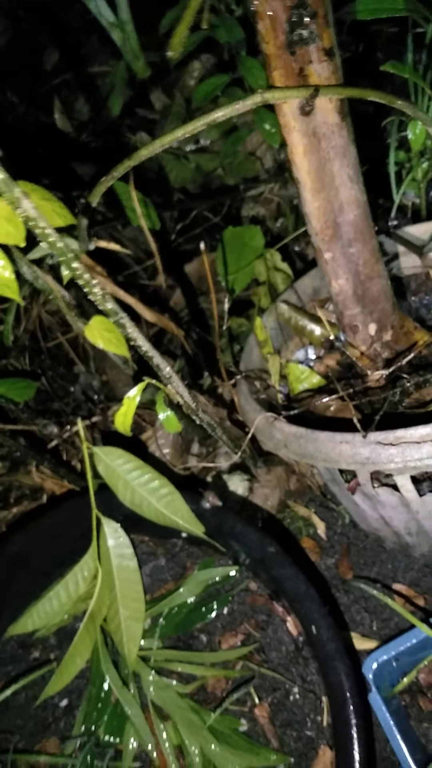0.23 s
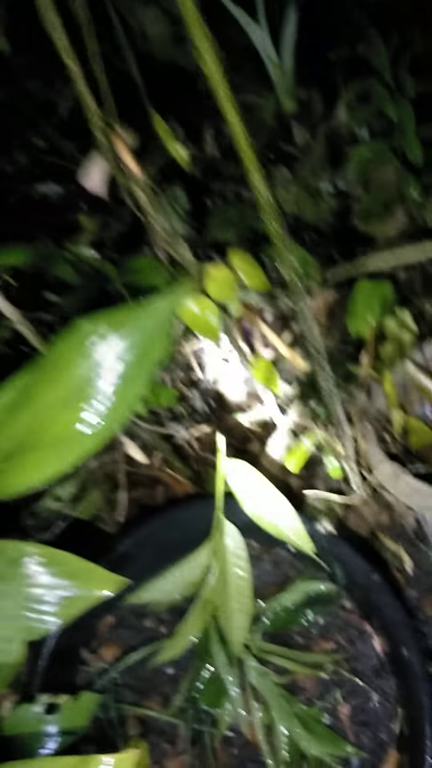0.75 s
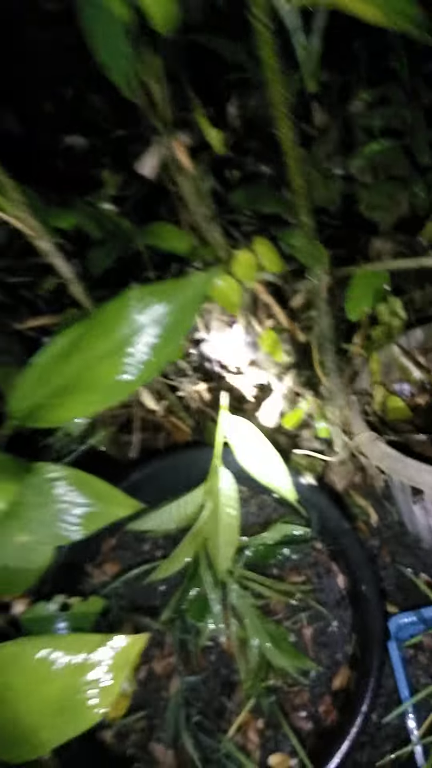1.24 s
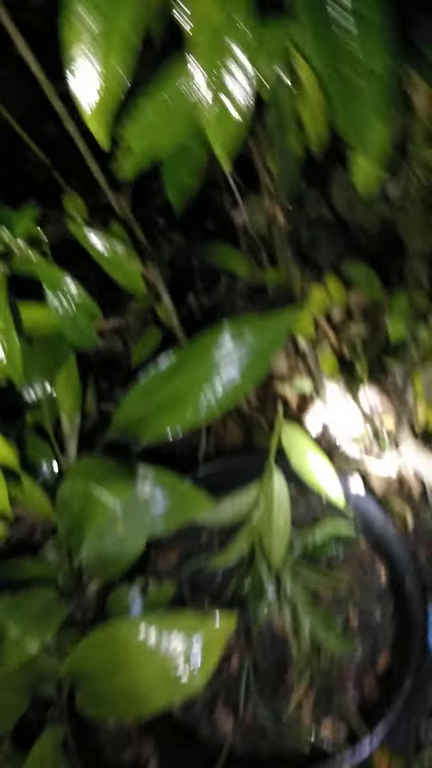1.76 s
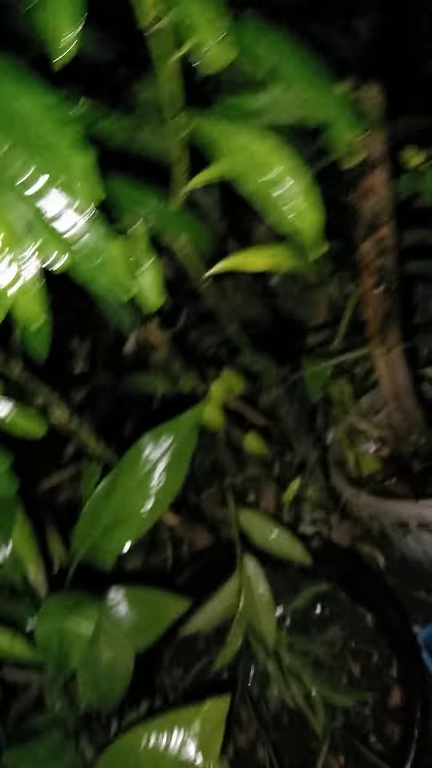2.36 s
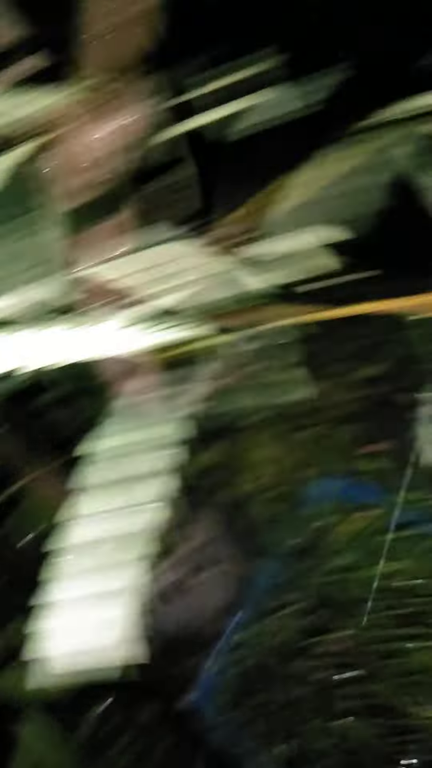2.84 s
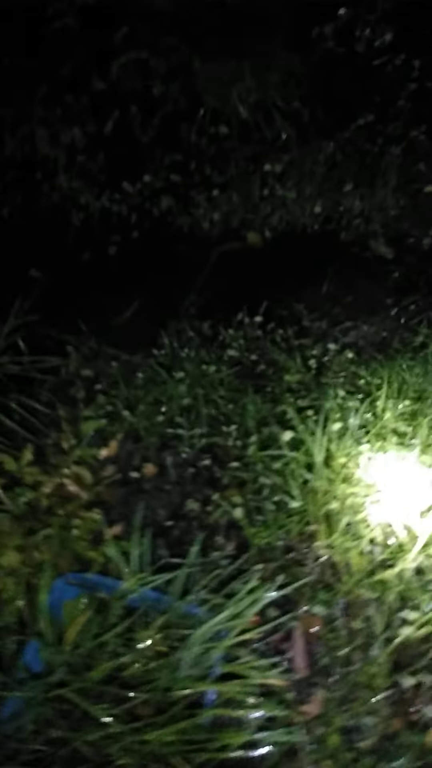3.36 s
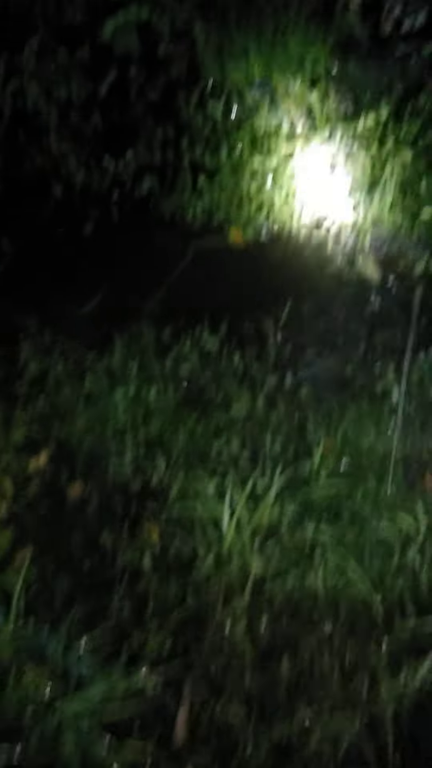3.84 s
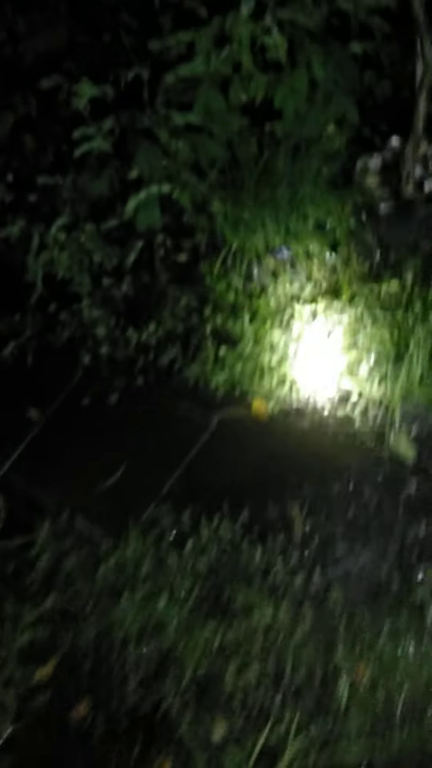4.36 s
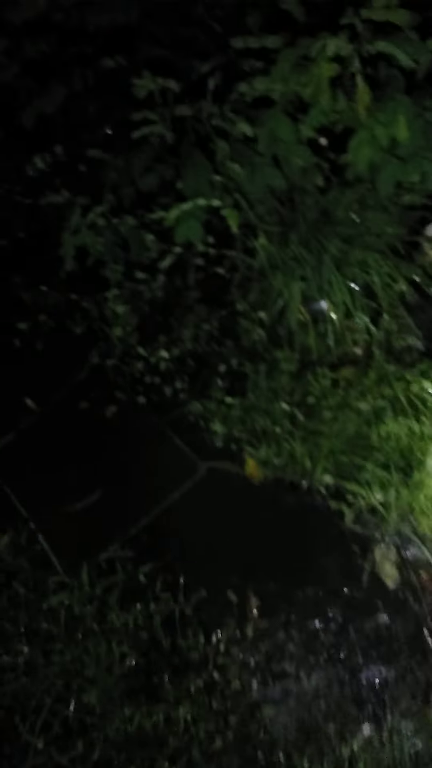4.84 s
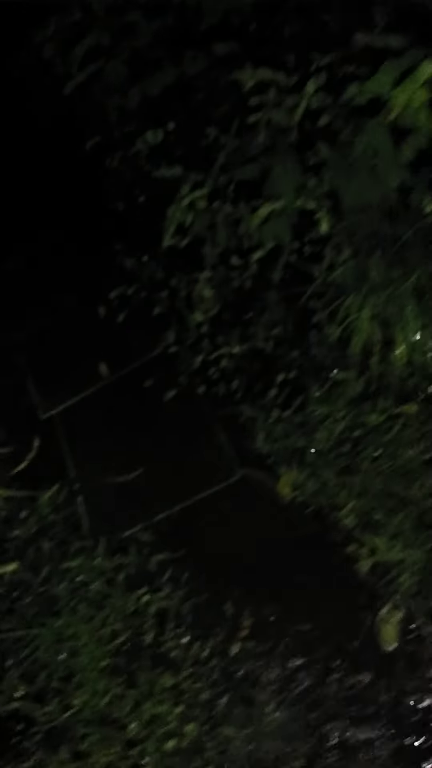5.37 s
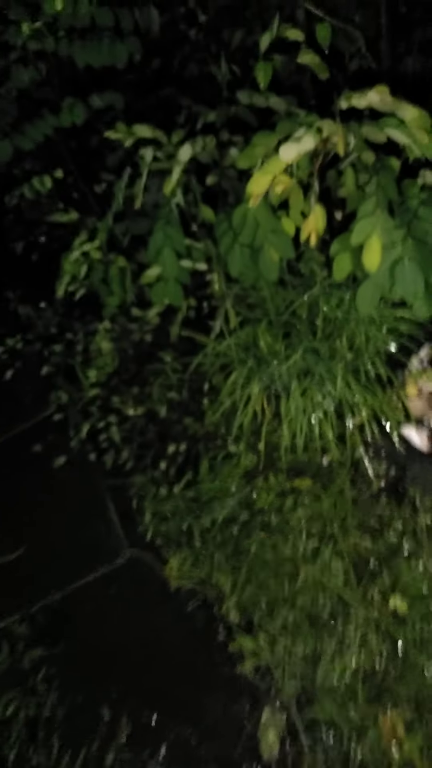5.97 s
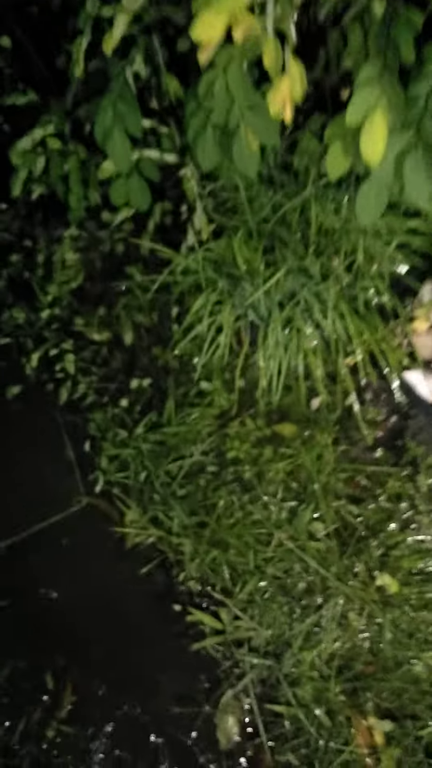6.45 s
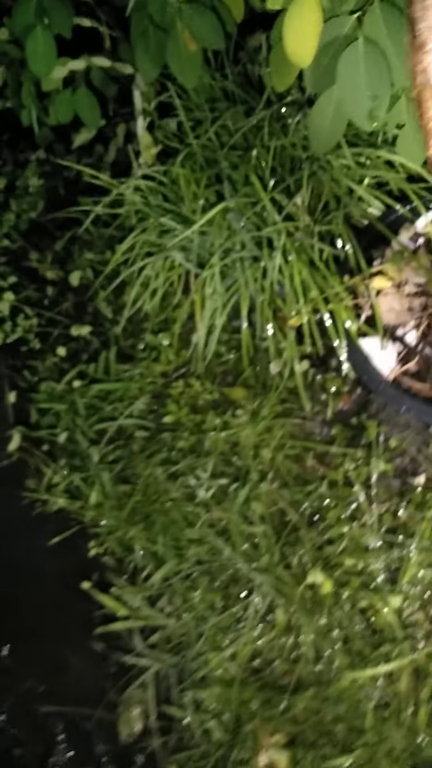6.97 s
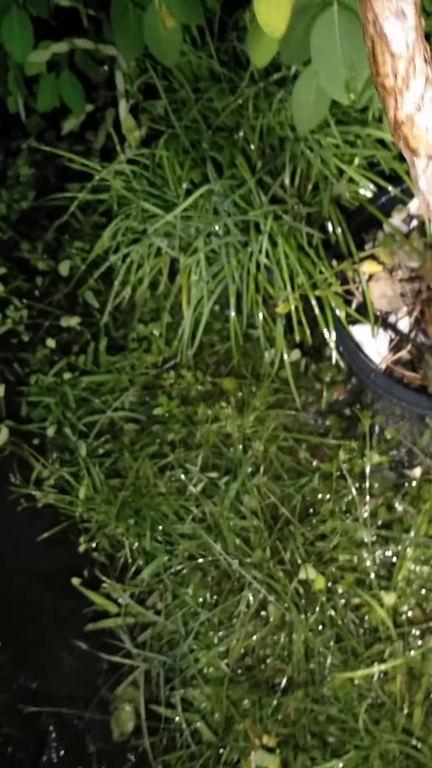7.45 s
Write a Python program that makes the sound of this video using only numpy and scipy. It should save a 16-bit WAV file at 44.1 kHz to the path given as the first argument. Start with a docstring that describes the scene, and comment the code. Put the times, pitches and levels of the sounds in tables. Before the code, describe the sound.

A mole cricket trills without pause close to a handheld microphone in a damp night garden, a dense, buzzing, fairly high tone. A leaf swishes past early on. The trill then weakens in steps as the microphone moves away, while soft thuds, twig cracks and grass ticks come in. Thin high crickets chirp quickly behind, over faint distant traffic and hum.

```python
"""Mole cricket in a night garden

A mole cricket trills in a damp garden at night while someone walks slowly away from it with a phone.
Each wing stroke is a short tone burst, with octave, undertone and rasp, a shifting ground bounce and plant echoes.
Two small crickets chirp higher up in gated tone bursts; a leaf brushes past as comb-filtered noise.
Steps are decaying sines, twigs and grass resonant noise clicks, over distant traffic, far insects and mains hum."""
import sys
import numpy as np
from scipy import signal
from scipy.fft import rfft, irfft
from scipy.io import wavfile
from scipy.ndimage import uniform_filter1d, map_coordinates

SR = 44100
rng = np.random.default_rng(int(sys.argv[2]) if len(sys.argv) > 2 else 0)


def wrap_up_sound(samples):
    """Save the sound to the file named by the first command line argument, as 16-bit audio."""
    columns = np.atleast_2d(samples).T
    # keep every value between -1 and 1, then stretch to whole-number steps
    tamed = np.clip(columns, -1, 1)
    steps = np.round(tamed * 32767).astype(np.int16)
    wavfile.write(sys.argv[1], SR, steps)


N = 340452
TIME = np.arange(N) / SR

# Direct trill tone at the moving phone, before dips and flutter. Each row: time in seconds, level in dB.
TRILL_LEVEL = [(0.0, -37), (0.85, -39), (1.15, -34), (1.45, -37), (1.95, -38), (2.15, -45.5), (2.35, -40.1),
               (3.3, -42), (3.65, -45), (3.95, -40.5), (4.35, -43.5), (5.1, -53.5), (5.9, -49),
               (6.4, -50.5), (6.75, -48.9), (6.92, -60), (7.28, -49), (7.72, -51.5)]
# Delay of the ground bounce as the phone moves. Each row: time in seconds, lag in ms.
GROUND_LAG = [(0.0, 2.359), (0.6, 2.225), (1.0, 2.026), (1.52, 1.559), (1.85, 1.403), (4.9, 1.404),
              (5.55, 1.281), (7.0, 1.459), (7.72, 1.401)]
# Brief dips of the trill. Each row: centre in seconds, length in seconds, depth in dB.
TRILL_DIPS = [(1.0, .09, 2.5), (4.215, .04, 3.5), (5.17, .05, 3), (6.46, .05, 2), (6.86, .025, 8),
              (7.493, .026, 11)]
# Spectrum of the leaf's hiss. Each row: frequency in Hz, relative level in dB.
LEAF_HISS_SPECTRUM = [(1200, -19), (2600, 1.5), (3250, -4.5), (3700, 6.5), (4100, -6.5), (4700, 5),
                      (5300, -4), (6100, -4), (7000, -8.5), (8000, -9), (11000, -22), (15000, -35)]
# Spectrum of the leaf's low scrape. Each row: frequency in Hz, relative level in dB.
LEAF_SCRAPE_SPECTRUM = [(40, -42), (80, 5), (140, -4.5), (270, -8.5), (410, -3), (650, -9.5), (950, -9.5),
                        (1200, -20), (1800, -7.5), (3000, -24.5)]
# Soft steps and hand knocks. Each row: start in seconds, level in dB, starting pitch in Hz, t60 in seconds.
STEP_THUDS = [(4.346, -37.5, 206, 0.023), (4.357, -49, 106, 0.11), (5.133, -42, 180, 0.018),
              (5.273, -44.5, 120, 0.034), (5.294, -47, 302, 0.03), (5.32, -43.5, 151, 0.03),
              (5.984, -49.5, 97, 0.16), (6.44, -53, 140, 0.035), (7.537, -48, 132, 0.04),
              (7.568, -50, 130, 0.052)]
# Twigs and grass snapping. Each row: start in seconds, peak in dB, centre in Hz, width of one filter pass
# in Hz, t60 of the exciting noise in seconds.
TWIG_SNAPS = [(0.701, -44.5, 5660, 3000, .037), (3.194, -48, 1300, 1200, .04),
              (3.198, -54, 10000, 9000, .02), (3.935, -50.5, 9500, 9000, .04),
              (4.446, -45, 7000, 7000, .015), (4.468, -47.5, 6500, 9000, 0.11),
              (4.492, -41, 2620, 2000, 0.039), (4.502, -51, 3400, 3500, 0.09),
              (4.546, -49, 11000, 9000, .02), (4.748, -47.5, 9000, 8000, .015),
              (5.201, -40.5, 1680, 900, 0.093), (5.221, -45, 4100, 3500, 0.048),
              (5.576, -47.5, 6500, 6000, .015), (5.91, -46, 7000, 7000, 0.033),
              (5.948, -49, 4200, 4000, 0.0091), (5.997, -49, 4140, 4000, .017),
              (6.54, -38, 6150, 6000, .012), (6.548, -40, 2000, 1600, 0.07),
              (6.548, -36, 5650, 5500, 0.065), (6.686, -46, 5500, 5000, .015)]
# Spectrum of distant traffic and night air. Each row: frequency in Hz, relative level in dB.
NIGHT_SPECTRUM = [(45, -24), (60, -13), (85, -2), (125, -6), (180, -2.5), (240, -4.5), (350, -4), (500, -6),
                  (950, -4.5), (1400, -10), (3200, -10), (5500, -17), (9000, -20.5), (12000, -28),
                  (15000, -31.5)]
# Far insect bands. Each row: centre in Hz, width of one filter pass in Hz, mean level in dB.
INSECT_BANDS = [(4130, 460, -86), (6970, 660, -72.5), (8730, 1700, -76), (10750, 680, -82.5)]

# Wings: initial stroke rate, its slow sag, mean ring tone
STROKE_HZ, SAG_HZ_PER_S, WING_HZ = 121.55, .15, 2230
# Falter: the stroke rate drops quickly and recovers slowly
FALTER_S, FALTER_ATTACK_S, FALTER_HZ, RECOVER_DB_PER_S = 3.87, .32, 4.4, 14
# Stroke-to-stroke scatter: phase, extra phase while faltering, level at the burrow
SLIP_RAD, FALTER_SLIP_RAD, FORCE_DB = .86, .35, .5
# Weaker parts of the song, and its plant echo, close to the burrow
OCTAVE_DB, UNDERTONE_DB, RASP_DB, ECHO_DB = -63.5, -62.5, -56.5, -51
# The highs leave as a beam and fade as the phone turns aside
OCTAVE_FADE_DB_PER_S, RASP_FADE_DB_PER_S = 1.3, 2.5
# Walk away from the burrow, losses over it, and trill flutter once plants are in the way
RETREAT_S, RETREAT_LENGTH_S = 3.86, 1.27
OCTAVE_LOSS_DB, UNDERTONE_LOSS_DB, RASP_LOSS_DB, ECHO_LOSS_DB, FLUTTER_DB = 59, 2.3, 9, 5, 1.5
# Ground bounce as a share of the direct sound: song, octave
SONG_BOUNCE_SHARE, OCTAVE_BOUNCE_SHARE = .66, .55
# Closest approach to the pots, and half width of the stay
POTS_S, POTS_WIDTH_S = 0.49, 0.64
# Leaf brush: timing, then level and release of hiss and scrape
BRUSH_S, BRUSH_ATTACK_S, BRUSH_HOLD_S = 1.577, .14, 0.086
HISS_DB, HISS_FALL_DB_PER_S, SCRAPE_DB, SCRAPE_FALL_DB_PER_S = -42, 79, -49, 41
# Leaf's reflection off the hand: first lag, growth
HAND_LAG_MS, HAND_LAG_MS_PER_S = 0.7, .94
# Vehicle on a distant road
ROAD_S, ROAD_ATTACK_S, ROAD_DB, ROAD_FALL_DB_PER_S = 0.18, 2, -64, 1
# Upper limit of the phone's pickup
TOP_HZ = 15350


def scene():
    """Sum of all the garden's sounds at one microphone."""
    low_cricket = chirper(chirp_hz=9.3, mean_db=-70, at_pots_db=-2.5, first_cycle=0.4, tone_hz=7080,
                          glide_hz=350, stroke_hz=110, sharpness=3.7, wet=1.15)
    high_cricket = chirper(chirp_hz=7.55, mean_db=-77, at_pots_db=12.5, first_cycle=0.53, tone_hz=8895,
                           glide_hz=900, stroke_hz=118, sharpness=1.4, wet=0.57)
    insects = mole_cricket() + low_cricket + high_cricket
    contacts = leaf_brush() + footfalls() + grass()
    return (insects + contacts + night())[None]


def mole_cricket():
    """Stroke train: wing tone, weak octave, lower resonance, file rasp, ground bounce and plant echo."""
    (trill_db,), (lag_ms,), away = curves(TRILL_LEVEL), curves(GROUND_LAG), retreat()
    falter = swell(FALTER_S, FALTER_ATTACK_S, 0, RECOVER_DB_PER_S)
    stroke_hz = STROKE_HZ - SAG_HZ_PER_S * TIME - FALTER_HZ * falter
    stroke, part = wing(stroke_hz, wander=.003)
    # every stroke catches the file a little differently
    catch, force, detune = rng.standard_normal((stroke[-1] + 1, 3))[stroke].T
    slip_rad = (SLIP_RAD + FALTER_SLIP_RAD * falter) * catch

    envelope, phase = burst(part, stroke_hz, WING_HZ + 14 * detune, glide_hz=31.2, skew=0.76)
    envelope = envelope ** 1.65 * undb(FORCE_DB * (1 + away) * force)
    # the horn of the burrow gently favours a broad band around the wing tone
    tone = unit(resonate(envelope * np.sin(phase + slip_rad), 2390, 1900))
    tone = tone * undb(-dips())

    _, octave_phase = burst(part, stroke_hz, 4450 + 35 * detune, glide_hz=200, skew=1)
    octave_noise = unit(resonate(noise(), 4240, 560))
    octave = unit(envelope * (np.sin(octave_phase + 2 * slip_rad) + 0.23 * octave_noise))
    octave = octave * undb(OCTAVE_DB - OCTAVE_FADE_DB_PER_S * TIME - OCTAVE_LOSS_DB * away)

    _, low_phase = burst(part, stroke_hz, tone_hz=1998, glide_hz=30, skew=1)
    undertone = unit(resonate(envelope * np.sin(low_phase + slip_rad), 1865, 120))
    undertone = undertone * undb(UNDERTONE_DB - UNDERTONE_LOSS_DB * away + 2 * walk(9.1))

    # the same uneven teeth pass in every stroke, with fresh scraping on top
    teeth = rng.standard_normal(size=90)
    scrape = envelope * (teeth[(part * len(teeth)).astype(int)] + 1.75 * noise())
    rasp = unit(resonate(scrape, 2505, 1670) + 0.23 * resonate(scrape, 3070, 300))
    rasp = rasp * undb(RASP_DB - RASP_FADE_DB_PER_S * TIME - RASP_LOSS_DB * away)

    song = tone * undb(trill_db + FLUTTER_DB * away * walk(45)) + undertone
    echo = foliage(tone, t60_s=0.1, shift_hz=1.5) * undb(ECHO_DB - ECHO_LOSS_DB * away)
    bounced_song = reflect(song, lag_ms, SONG_BOUNCE_SHARE)
    bounced_octave = reflect(octave, lag_ms, OCTAVE_BOUNCE_SHARE)
    return bounced_song + bounced_octave + rasp + echo


def wing(stroke_hz, wander):
    """Integrate the stroke rate; returns each stroke's number and the share of it gone by."""
    turns = np.cumsum(stroke_hz * (1 + wander * walk(120))) / SR
    return turns.astype(int), turns % 1


def burst(part, stroke_hz, tone_hz, glide_hz, skew):
    """One swelling tone per stroke; returns its envelope and the phase of the wing's ring."""
    age_s = (part - .5) / stroke_hz
    envelope = np.sin(np.pi * part ** skew) ** 2
    # the scraper slows along the file, so the tone sags within a stroke
    phase = 2 * np.pi * age_s * (tone_hz - glide_hz * (part - .5) / 2)
    return envelope, phase


def retreat():
    """Share of the walk away from the burrow that lies behind, 0 to 1."""
    return np.clip((TIME - RETREAT_S) / RETREAT_LENGTH_S, 0, 1)


def dips():
    """Level lost in the trill's brief bell-shaped dips, in dB."""
    return sum(db * np.exp(-(2 * (TIME - s) / length_s) ** 2) for s, length_s, db in TRILL_DIPS)


def chirper(chirp_hz, mean_db, at_pots_db, first_cycle, tone_hz, glide_hz, stroke_hz, sharpness, wet):
    """Small cricket: quick strokes gated into regular chirps; louder or screened beside the pots."""
    chirp_rate = chirp_hz * (1 + .02 * walk(2))
    # first_cycle places the first chirp's peak, as a share of a cycle
    gate = np.abs(np.cos(np.pi * (np.cumsum(chirp_rate) / SR - first_cycle))) ** sharpness
    stroke, part = wing(stroke_hz, wander=.003)
    envelope, phase = burst(part, stroke_hz, tone_hz, glide_hz, skew=1.0)
    catch_rad = 2 * np.pi * rng.random(stroke[-1] + 1)[stroke]
    strokes = envelope ** 2 * np.sin(phase + catch_rad)
    song = unit(gate * strokes * undb(1.6 * walk(12)))
    at_pots = 1 / (1 + ((TIME - POTS_S) / POTS_WIDTH_S) ** 2)
    wet_song = unit(song + wet * foliage(song, t60_s=0.11, shift_hz=3.2))
    return wet_song * undb(mean_db + at_pots_db * at_pots)


def leaf_brush():
    """A leaf slides past the phone with a swish of noise and pushes air at the port."""
    slips = noise() * undb(0.64 * walk(300))
    # the hand's reflection arrives ever later, so its comb of peaks sweeps down
    lag_ms = HAND_LAG_MS + HAND_LAG_MS_PER_S * np.maximum(TIME - BRUSH_S, 0)
    swish = colour(reflect(slips, lag_ms, 0.4), LEAF_HISS_SPECTRUM)
    hiss = swish * swell(BRUSH_S, BRUSH_ATTACK_S, BRUSH_HOLD_S, HISS_FALL_DB_PER_S)
    scrape = colour(noise(), LEAF_SCRAPE_SPECTRUM)
    scrape = scrape * swell(BRUSH_S, BRUSH_ATTACK_S, BRUSH_HOLD_S, SCRAPE_FALL_DB_PER_S)
    return hiss * undb(HISS_DB) + scrape * undb(SCRAPE_DB)


def footfalls():
    """Thuds on wet ground as sinking, decaying sines; twigs and grass as resonant noise bursts."""
    out, age_s = np.zeros(N + SR), np.arange(SR // 5) / SR
    for s, db, hz, t60_s in STEP_THUDS:
        # the pitch sinks as the contact softens
        thud = np.sin(2 * np.pi * hz * age_s / (1 + 3 * age_s)) * undb(-60 * age_s / t60_s)
        out[int(s * SR):][:len(age_s)] += undb(db) * thud
    for s, db, hz, width_hz, t60_s in TWIG_SNAPS:
        crack = resonate(rng.standard_normal(len(age_s)) * undb(-60 * age_s / t60_s), hz, width_hz)
        out[int(s * SR):][:len(age_s)] += undb(db) * crack / np.abs(crack).max()
    return out[:N]


def grass(count=45, floor_db=-61, spread_db=3, t60_s=0.02):
    """Faint resonant ticks of wet blades springing back, at random times from 2.3 to 7.3 s."""
    clicks, age_s = np.zeros(N), np.arange(SR // 20) / SR
    when, size = rng.random((count, 2)).T
    start = (np.interp(when, [0, 1], [2.3, 7.3]) * SR).astype(int) % N
    # many ticks near the floor, few loud ones
    clicks[start] = undb(floor_db + spread_db * -np.log(size + .02))
    tick = resonate(rng.standard_normal(len(age_s)) * undb(-60 * age_s / t60_s), 8000, 10000)
    return signal.fftconvolve(clicks, tick / np.abs(tick).max())[:N]


def night(air_db=-57.0, air_fade_db_per_s=0.4652, hum_hz=100, hum_db=-70, hum_fade_db_per_s=1.3):
    """Coloured noise for traffic and air, a sine for mains hum, noise bands for a road and far insects."""
    # hum and air sink a little further down the garden
    air = colour(noise(), NIGHT_SPECTRUM) * undb(air_db - air_fade_db_per_s * TIME + 0.13 * walk(1.8))
    hum = np.sqrt(2) * np.sin(2 * np.pi * hum_hz * TIME)
    hum = hum * undb(hum_db - hum_fade_db_per_s * TIME + 2 * walk(11))
    road = unit(resonate(noise(), 349, 222)) * undb(ROAD_DB + 1.36 * walk(5.6))
    road = road * swell(ROAD_S, ROAD_ATTACK_S, 0, ROAD_FALL_DB_PER_S)
    chorus = np.zeros(N)
    for hz, width_hz, db in INSECT_BANDS:
        chorus += unit(resonate(noise(), hz, width_hz)) * undb(db + 1.8 * walk(18))
    return air + hum + road + chorus


def foliage(x, t60_s, shift_hz):
    """Countless small echoes; their pattern shifts as the microphone moves."""
    age_s = np.arange(SR // 2) / SR
    # noise tails, silent for the first 4 ms
    tails = rng.standard_normal((2, len(age_s))) * undb(-60 * age_s / t60_s) * (age_s > .004)
    here, there = (unit(signal.fftconvolve(x, tail)[:N]) for tail in tails)
    place = 2 * np.pi * shift_hz * TIME + walk(4.043)
    return np.cos(place) * here + np.sin(place) * there


def reflect(x, lag_ms, share):
    """Add one reflection; as its lag changes, a comb of notches sweeps through the sound."""
    late = map_coordinates(x, [(TIME - lag_ms / 1000) * SR], mode="mirror")
    return x + share * late


def swell(start_s, attack_s, hold_s, fall_db_per_s):
    """Envelope: straight rise to 1, hold, then a steady fall in dB."""
    age_s = TIME - start_s
    fall_db = fall_db_per_s * np.maximum(age_s - attack_s - hold_s, 0)
    return np.clip(age_s / attack_s, 0, 1) * undb(-fall_db)


def resonate(x, hz, width_hz):
    """A resonance applied twice, for steeper skirts."""
    b, a = signal.iirpeak(min(hz, SR * .45), hz / width_hz, fs=SR)
    return signal.lfilter(b, a, signal.lfilter(b, a, x))


def colour(x, points):
    """Give a sound the spectrum of (Hz, dB) points, log-interpolated in Hz, at rms 1."""
    hz, db = np.transpose(points)
    bin_hz = np.maximum(np.fft.rfftfreq(len(x), 1 / SR), 1)
    gain = undb(np.interp(np.log(bin_hz), np.log(hz), db))
    return unit(irfft(rfft(x) * gain, len(x)))


def curves(table):
    """Columns of a table, joined by straight lines in time."""
    s, *columns = np.transpose(table)
    return [np.interp(TIME, s, column) for column in columns]


def walk(rate_hz):
    """Slow random drift at rms near 1: held random values, smoothed twice."""
    hold = max(int(SR / rate_hz), 1)
    held = np.repeat(rng.standard_normal(N // hold + 1), hold)
    return unit(uniform_filter1d(uniform_filter1d(held, hold), hold)[:N])


def noise():
    """White noise."""
    return rng.standard_normal(N)


def unit(x):
    """Scale to rms 1."""
    return x / np.sqrt(np.mean(x ** 2))


def undb(db):
    """Decibels to gain."""
    return 10 ** (np.asarray(db) / 20)


def record(dry):
    """The phone drops the deep bass and cuts the top."""
    dry = signal.sosfilt(signal.butter(8, 56, "high", fs=SR, output="sos"), dry)
    return signal.sosfilt(signal.ellip(10, .2, 70, TOP_HZ, fs=SR, output="sos"), dry)


dry = scene()
out = record(dry)
wrap_up_sound(out)
```